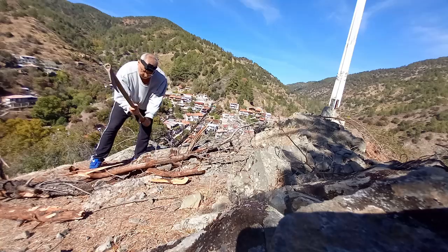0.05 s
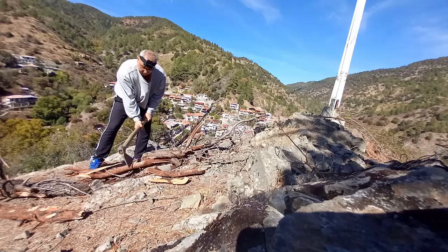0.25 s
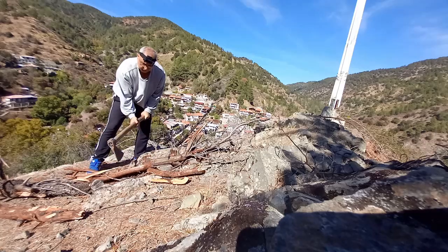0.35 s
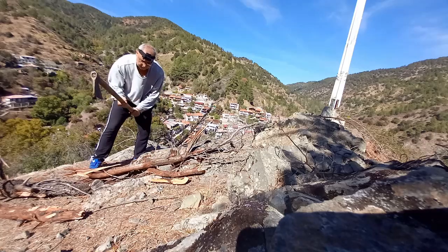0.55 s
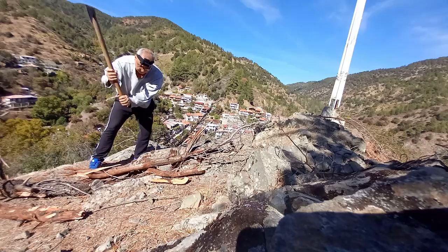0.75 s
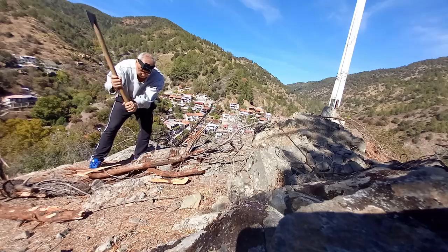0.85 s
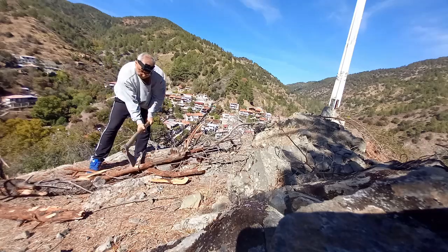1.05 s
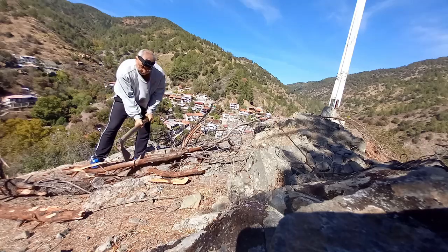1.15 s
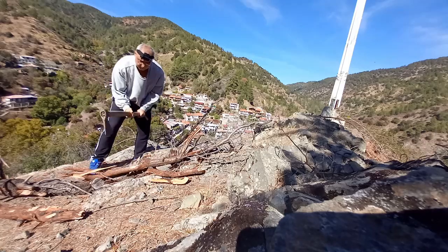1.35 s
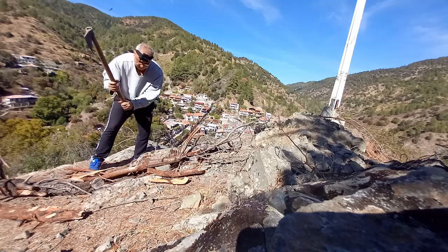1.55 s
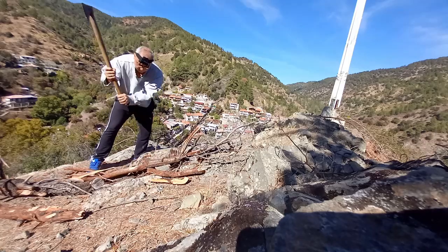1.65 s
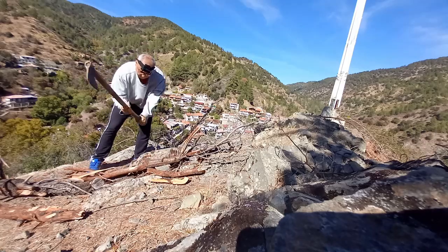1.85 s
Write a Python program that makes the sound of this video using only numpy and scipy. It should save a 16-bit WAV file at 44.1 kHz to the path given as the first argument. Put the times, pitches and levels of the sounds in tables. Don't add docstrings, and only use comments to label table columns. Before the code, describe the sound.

A mattock strikes stony ground twice among dry branches, with cracking wood and scattering pebbles

```python
import sys
import numpy as np
from scipy import signal
from scipy.fft import rfft, irfft, next_fast_len
from scipy.io import wavfile

SR = 44100
rng = np.random.default_rng(int(sys.argv[2]) if len(sys.argv) > 2 else 0)


def store_pcm(level_fs):
    pcm = np.round(np.clip(level_fs, -1, 1) * 32767).astype(np.int16)
    wavfile.write(sys.argv[1], SR, np.atleast_2d(pcm).T)


def level_to_linear(level):
    exponent = np.asarray(level, float) / 20
    return 10 ** exponent


N = 83790

# start in seconds, peak in dB, splintering length in seconds, fade meanwhile in dB, blade in dB.
BLOWS = [
    (0.2236, -4.5, .018, 1, -18),
    (1.1112, -5.5, 0.0088, 9.5, 8.5),
]
# frequency in Hz, density in dB per Hz.
SPLINTER_SPECTRA = [
    [(150, -26), (520, -15), (1300, -5.5), (2400, -12.5), (5000, -14.5), (8300, -18), (10000, -24),
     (15000, -19)],
    [(150, -44), (700, -4), (1450, -20), (2600, -12), (4500, -7), (8300, -20.5), (10500, -29), (14000, -20)],
]
# frequency in Hz, level in dB, T60 in seconds.
KNOCK_MODES = [
    [(106, -15, 0.14), (372, -10.5, 0.13), (451, -2, 0.047), (540, -9.5, 0.16), (635, -4, 0.041),
     (902, -8.5, 0.075)],
    [(95, -18, 0.092), (365, -10.5, 0.064), (500, 7, 0.012), (676, -2, 0.016), (865, -10.5, 0.018)],
]
# frequency in Hz, level in dB, T60 in seconds.
BLADE_MODES = [(3795, -36, .5), (4775, -42, .15)]
# peak time in seconds, peak in dB, frequency in Hz, swell in seconds, fade in seconds.
HUMS = [(0.3356, -15.5, 228, 0.084, 0.022), (.385, -24, 215, 0.0084, 0.018),
        (0.314, -28.5, 615, 0.016, 0.032), (0.346, -26, 400, 0.016, 0.015), (.435, -29.5, 155, .015, .015),
        (.462, -32.5, 215, 0.012, .025), (0.331, -23, 125, 0.026, 0.017), (1.152, -24, 236, 0.021, 0.02),
        (1.192, -22.5, 258, 0.006, 0.01), (1.215, -26.5, 205, 0.025, 0.024), (1.18, -29, 140, 0.025, 0.018),
        (1.275, -30, 106, 0.016, .015), (1.1, -29, 245, 0.014, 0.012), (1.1, -30.5, 120, 0.015, 0.025),
        (1.308, -29, 140, 0.033, 0.0097)]
# start in seconds, peak in dB, frequency in Hz, T60 in seconds.
BUMPS = [(.312, -19.5, 405, 0.061), (.43, -23, 495, 0.027), (0.669, -20.5, 460, 0.015),
         (0.867, -38.5, 231, 0.092), (1.164, -26, 338, 0.1), (1.425, -31, 338, 0.098),
         (1.45, -30, 140, 0.16), (1.452, -29, 290, 0.068), (1.538, -30, 101, 0.058), (1.733, -39, 243, 0.2),
         (.275, -18.5, 305, .06), (1.405, -30.5, 700, 0.055), (1.65, -39.5, 643, 0.12),
         (1.83, -38.5, 624, .08), (1.79, -40.5, 333, 0.18)]
# start in seconds, peak in dB, pitch in Hz, length in seconds.
PEBBLES = [(0.921, -33.5, 2070, 0.0055), (0.059, -29.5, 2780, 0.0036), (0.078, -28.5, 2160, 0.0047),
           (0.118, -28.5, 3430, .003), (0.187, -31.5, 2080, 0.0079), (0.256, -17, 2130, 0.0024),
           (0.267, -19, 2100, .003), (.309, -16, 4900, 0.0047), (0.335, -12, 3600, 0.0031),
           (0.3465, -6.5, 1930, 0.003), (0.353, -19, 3420, 0.0056), (.372, -16.5, 3700, 0.0027),
           (0.438, -22, 2400, 0.0037), (0.4893, -13.5, 3860, 0.0021), (.5731, -24, 1710, 0.0044),
           (0.66, -21.5, 2300, 0.0043), (0.682, -30, 3360, 0.0033), (0.702, -26, 3870, 0.0063),
           (0.902, -33, 2670, .004), (1.014, -39.5, 2160, 0.0069), (1.1098, -8, 4700, 0.0021),
           (1.1138, -6.5, 4430, 0.0013), (1.1175, -4, 2560, 0.002), (1.112, -10, 3140, 0.0014),
           (0.536, -32, 2900, 0.0029), (0.6085, -26, 4270, 0.0026), (0.634, -28, 2570, .004),
           (0.7284, -28, 3400, .003), (0.7484, -29, 5200, .002), (0.781, -31, 2200, .003),
           (0.805, -33, 4900, 0.0036), (.8473, -51, 4200, 0.0041), (0.8824, -35.5, 3670, 0.011),
           (0.8986, -25, 1280, .002), (0.912, -30, 4730, 0.0041), (0.948, -41, 2010, 0.0035),
           (0.9556, -37.5, 5000, 0.0036), (1.037, -46, 4500, .003), (0.173, -34, 3300, 0.0035),
           (.395, -24, 2980, .004), (0.464, -26, 1930, 0.0048), (0.506, -24, 4600, 0.0063)]
LATER_PEBBLES = [(1.206, -17, 2640, 0.015), (1.291, -24, 5400, 0.01), (1.3331, -20, 1840, 0.0063),
                 (1.341, -19, 4050, 0.0039), (1.346, -23, 3750, 0.0028), (1.360, -20, 4000, 0.0018),
                 (1.378, -23, 3600, 0.0046), (1.401, -17.5, 5100, 0.0021), (1.407, -25, 3600, .003),
                 (1.426, -24.5, 4040, 0.013), (1.454, -23.5, 6600, 0.0021), (1.511, -23, 3500, 0.006),
                 (1.576, -28.5, 5550, 0.0035), (1.644, -30, 1960, 0.0026), (1.665, -27, 5030, 0.0044),
                 (1.7193, -34, 4240, 0.014), (1.731, -35, 2030, 0.0092), (1.75, -30.5, 2040, 0.0098),
                 (1.841, -30.5, 4970, 0.0031), (1.854, -44, 4780, 0.003), (1.1507, -30, 2220, 0.0025),
                 (1.49, -27, 2970, .004), (1.548, -28, 7600, 0.0022), (1.563, -29, 2510, .004),
                 (1.6127, -35, 4600, .003), (1.622, -30, 4960, .003), (1.655, -30.5, 1920, 0.0033),
                 (1.70, -39, 3000, 0.0025), (1.826, -39, 3500, 0.0038), (1.864, -47, 5500, 0.0022)]
# time in seconds, level in dB.
GRIT_FLOW = [(0, -43), (.1, -47), (.15, -51), (.221, -59), (.24, -33), (.3, -31.5), (.35, -28.5), (.4, -32),
             (0.519, -35), (.65, -41.5), (.8, -44.5), (.86, -49), (1.0, -56), (1.108, -56), (1.121, -31),
             (1.201, -32.5), (1.452, -39.5), (1.9, -56)]
# frequency in Hz, density in dB per Hz.
GRIT_SPECTRUM = [(60, -16), (110, 0), (650, -6), (950, -14), (2000, -7.5), (8000, -14), (9800, -23.5),
                 (15000, -13)]
# frequency in Hz, level in dB, T60 in seconds.
RUBBLE_MODES = [(229, -5, 0.055), (1840, -3, 0.026), (2400, -4.5, 0.03), (3630, 1, 0.012),
                (4720, -2, 0.0068)]
# start in seconds, peak in dB.
TWIGS = [(0.017, -22.5), (0.0286, -24.5), (0.0515, -22), (0.182, -32.5), (0.538, -28), (0.681, -28),
         (.812, -36), (1.332, -19), (1.342, -18), (1.396, -14), (1.402, -18), (1.406, -23), (1.666, -26),
         (1.717, -32), (1.853, -32.5), (0.575, -26), (.6118, -33), (.7265, -37), (.738, -36), (.759, -36),
         (.788, -35), (0.9253, -31), (.962, -34), (0.9727, -39), (1.549, -31), (1.5756, -25), (1.731, -32),
         (1.864, -45), (1.888, -60)]
# frequency in Hz, density in dB per Hz.
AIR_SPECTRUM = [(50, 20), (240, 13), (650, 16.5), (1000, -50), (8000, -81), (10000, -81), (15000, -27)]
# frequency in Hz, left-right likeness from 0 to 1.
PORT_LIKENESS = [(60, 0.34), (250, 0.92), (1000, 0.99), (2500, 0.28), (15000, 0.08)]
# frequency in Hz, left over right in dB.
PORT_LEAN = [(40, 2), (150, 3), (2000, 1), (5000, 2.5), (9000, 11.5), (14000, 2.5)]
# frequency in Hz, lead of the left in radians.
PORT_LEAD = [(200, 0.51), (780, 0.77), (1380, 1.87), (1720, 1.01), (3450, 0.38), (4570, -0.6), (7580, -1),
             (12000, -1.26)]

SPLINTERS_PER_S, SPLINTER_SPREAD_DB, SPLINTER_T60_S = 16000, 2.5, 0.0091
SPLINTER_CLUMP_DB, SPLINTER_CLUMPS_PER_S = 3.5, 250
KNOCK_LAG_S, KNOCK_CONTACT_HZ, BLADE_CONTACT_HZ = 0.00057, 1490, 8200
HUM_WIDTH_HZ, HUM_ROUGH_DB, HUM_START_S, HUM_SAG_HZ_PER_S = 7, 2.5, 0.02, 170
LANDING_S, CLINK_CYCLES, CLINK_DB, TAP_DB = 0.0009, 22.0, -7, -2.5
SPRAY_DB, SPRAY_REACH = -1, 2.2
HISS_DB, PATCHY_DB, RUBBLE_DB, RUBBLE_SHARE = 5, 1.45, -5.5, 0.29
GRAINS_DB, GRAINS_PER_S, GRAIN_CYCLES, GRAIN_SPREAD_DB = -2.5, 1500, 11.2, 2.5
DULLING_DB_PER_DB, DULL_HZ = 0.21, 5000
TWIG_S, TWIG_SPREAD_DB = 0.0025, 3.5
AIR_DB = -52.5
DUCK_AHEAD_S, DUCK_DB = 0.014, -24
LOW_CUT_HZ, TOP_HZ = 60, 16020


def rms_one(x):
    return x / np.sqrt(np.mean(x ** 2) + 1e-20)


def at_hz(points, hz):
    p = np.array(points, float)
    return np.interp(np.log(np.maximum(hz, 1)), np.log(np.maximum(p[:, 0], 1)), p[:, 1])


def colour(x, spectrum):
    cepstrum = irfft(np.log(level_to_linear(at_hz(spectrum, np.arange(2049) * SR / 4096))))
    cepstrum[1:2048] *= 2
    cepstrum[2049:] = 0
    h = irfft(np.exp(rfft(cepstrum)))
    return signal.fftconvolve(x, h / np.sqrt(np.sum(h ** 2)))[:N]


def drift(rate):
    r = np.exp(-40 * np.pi * rate / SR)
    slow = signal.lfilter([1], [1, -2 * r, r * r], rng.standard_normal(N // 20 + 2002))[2000:]
    return np.interp(np.arange(N) / 20, np.arange(len(slow)), rms_one(slow))


def ring(clicks, hz, t60_s):
    r, w = level_to_linear(-60 / (t60_s * SR)), 2 * np.pi * hz / SR
    return signal.lfilter([0, np.sin(w)], [1, -2 * r * np.cos(w), r * r], clicks + 1e-18)


def thud(push, hz, t60_s):
    radiates = signal.butter(2, hz / 2, "high", fs=SR, output="sos")
    return signal.sosfilt(radiates, ring(push, hz, t60_s))


def click(s, hz):
    out, t = np.zeros(N + 2000), np.arange(2000) * 2 * np.pi * hz / SR
    pulse = t * np.exp(-t)
    out[int(s * SR):][:2000] = pulse / np.sum(pulse)
    return out[:N]


def grains(per_s, spread_db):
    sizes = level_to_linear(spread_db * np.minimum(rng.exponential(1, N), 4)) * rng.choice([-1, 1], N)
    return sizes * (rng.random(N) < per_s / SR)


def splinters():
    t, out = np.arange(N) / SR, np.zeros(N)
    clump_db = SPLINTER_CLUMP_DB * drift(SPLINTER_CLUMPS_PER_S)
    bits = level_to_linear(clump_db) * rms_one(grains(SPLINTERS_PER_S, SPLINTER_SPREAD_DB))
    for (s, db, length_s, fade_db, _), spectrum in zip(BLOWS, SPLINTER_SPECTRA):
        since = np.maximum(t - s, 0)
        bite_db = db - 8.5 - fade_db * since / length_s
        die_db = -60 * np.maximum(since - length_s, 0) / SPLINTER_T60_S
        out += colour(bits * (t > s) * level_to_linear(bite_db + die_db), spectrum)
    return out


def knocks():
    out = np.zeros(N)
    for (s, db, *_), modes in zip(BLOWS, KNOCK_MODES):
        push = click(s + KNOCK_LAG_S, KNOCK_CONTACT_HZ)
        out -= sum(level_to_linear(db + mode_db) * thud(push, hz, t60_s) for hz, mode_db, t60_s in modes)
    return out


def blade():
    out = np.zeros(N)
    for s, *_, blade_db in BLOWS:
        contact = click(s, BLADE_CONTACT_HZ)
        out += sum(level_to_linear(blade_db + db) * ring(contact, hz, t60_s) for hz, db, t60_s in BLADE_MODES)
    return out


def log():
    t, out = np.arange(N) / SR, np.zeros(N)
    for s, db, hz, swell_s, fade_s in HUMS:
        blow_s = max(b[0] for b in BLOWS if b[0] < s)
        sag_hz = HUM_SAG_HZ_PER_S * np.clip(t - s, -.1, .2)
        pitch_hz = hz - sag_hz + HUM_WIDTH_HZ * drift(11.3)
        tone = np.sin(2 * np.pi * np.cumsum(pitch_hz) / SR) * level_to_linear(HUM_ROUGH_DB * drift(63))
        onset = np.clip((t - blow_s) / HUM_START_S, 0, 1)
        swell = np.exp(np.where(t < s, (t - s) / swell_s, (s - t) / fade_s))
        out += level_to_linear(db) * onset * swell * tone
    for s, db, hz, t60_s in BUMPS:
        push = click(s, 2 * hz)
        out += level_to_linear(db) * (thud(push, hz, t60_s) + 1.04 * thud(push, 1.2 * hz, t60_s))
    return out


def pebble_taps():
    out = np.zeros(N)
    for s, db, hz, _ in PEBBLES + LATER_PEBBLES:
        out += level_to_linear(db + TAP_DB) * ring(click(s + LANDING_S, 2 * hz), hz, CLINK_CYCLES / hz)
    return out


def pebbles():
    since, rattle = np.arange(3000) / SR, rms_one(grains(12000, 2.5))
    clinks, spray = np.zeros(N), np.zeros(N)
    for s, db, hz, length_s in PEBBLES + LATER_PEBBLES:
        i = slice(int(s * SR), int(s * SR) + len(since))
        envelope = level_to_linear(db) * np.minimum(since / LANDING_S, 1) * np.exp(-since / max(length_s, .001))
        burst = rattle[i] * envelope[:len(rattle[i])]
        keep = np.exp(-2 * np.pi * SPRAY_REACH * hz / SR)
        spray[i] += signal.lfilter([1 - keep], [1, -keep], burst)
        evenness = np.sqrt(hz / CLINK_CYCLES / SR * 28)
        clinks[i] += level_to_linear(CLINK_DB) * ring(burst, hz, CLINK_CYCLES / hz) * evenness
    spectrum = [(300, -24), (1190, -3), (5000, 0.5), (10000, -5.5), (14000, -2.5)]  # Hz, dB per Hz
    return clinks + level_to_linear(SPRAY_DB) * colour(spray, spectrum)


def sand_hiss(together):
    white, edges_hz = colour(rng.standard_normal(N), GRIT_SPECTRUM), 45 * 2 ** np.arange(0, 8.6, .5)
    out = np.zeros(N)
    for k, (low_hz, high_hz) in enumerate(zip(edges_hz, edges_hz[1:])):
        band = signal.butter(2, [low_hz, high_hz], "band", fs=SR, output="sos")
        patches = level_to_linear(PATCHY_DB * (1.55 * together + drift(50)))
        out += patches * signal.sosfilt(band, white) * (-1) ** k
    return rms_one(out)


def grit(together):
    born = grains(GRAINS_PER_S * level_to_linear(1.5 * together), GRAIN_SPREAD_DB)
    dealt = rng.integers(0, 24, N)
    stones = sum(ring(born * (dealt == k), hz, GRAIN_CYCLES / hz)
                 for k, hz in enumerate(np.geomspace(900, 15000, 24)))
    struck = born * (rng.random(N) < RUBBLE_SHARE)
    rubble = sum(level_to_linear(db) * rms_one(ring(struck * rng.standard_normal(N), hz, t60_s))
                 for hz, db, t60_s in RUBBLE_MODES)
    sand = level_to_linear(HISS_DB) * sand_hiss(together) + level_to_linear(GRAINS_DB) * rms_one(colour(stones, GRIT_SPECTRUM))
    low = signal.sosfilt(signal.butter(1, DULL_HZ, fs=SR, output="sos"), sand)
    flow = level_to_linear(np.interp(np.arange(N) / SR, *np.transpose(GRIT_FLOW)))
    top = (sand - low) * (flow / level_to_linear(-40)) ** DULLING_DB_PER_DB
    return flow * (low + top + level_to_linear(RUBBLE_DB) * rubble)


def twigs():
    t = np.arange(N) / SR
    envelope = sum((t > s) * level_to_linear(db) * np.exp(-np.maximum(t - s, 0) / TWIG_S) for s, db in TWIGS)
    crackle = envelope * rms_one(grains(12000, TWIG_SPREAD_DB))
    return colour(crackle, [(2000, -26), (10900, -6), (14500, 0.1)])


def air():
    return level_to_linear(AIR_DB) * colour(rng.standard_normal(N), AIR_SPECTRUM)


def limiter_duck():
    t = np.arange(N) / SR
    return level_to_linear(sum(DUCK_DB * np.clip(1 - (s - t) / DUCK_AHEAD_S, 0, 1) * (t < s) for s, *_ in BLOWS))


def ports(alike_part, unlike_part):
    size = next_fast_len(N + 4096)
    hz = np.arange(size // 2 + 1) * SR / size
    alike = np.clip(at_hz(PORT_LIKENESS, hz), 0, 1)
    turn = level_to_linear(at_hz(PORT_LEAN, hz) / 2) * np.exp(.5j * at_hz(PORT_LEAD, hz))
    mid = np.sqrt((1 + alike) / 2) * rfft(alike_part, size)
    side = np.sqrt((1 - alike) / 2) * rfft(unlike_part, size)
    return np.array([irfft((mid + side) * turn, size)[:N], irfft((mid - side) / turn, size)[:N]])


def scene():
    together, duck = drift(45), limiter_duck()
    first, second = [splinters() + duck * (grit(together) + pebbles() + twigs() + air()) for _ in range(2)]
    solid = knocks() + blade() + pebble_taps() + duck * log()
    return ports(first + solid, second)


def band_limit(x):
    return signal.sosfilt(signal.butter(12, 17010, fs=SR, output="sos"), x)


def record(dry):
    x = signal.sosfilt(signal.butter(4, LOW_CUT_HZ, "high", fs=SR, output="sos"), dry)
    x = signal.sosfilt(signal.cheby2(16, 34, TOP_HZ, fs=SR, output="sos"), x)
    mix = 1.22 * np.tanh(x / 1.393)
    return band_limit(mix)


dry = scene()
out = record(dry)
store_pcm(out)
```